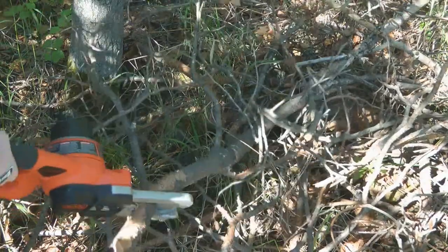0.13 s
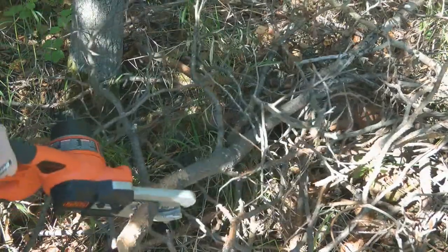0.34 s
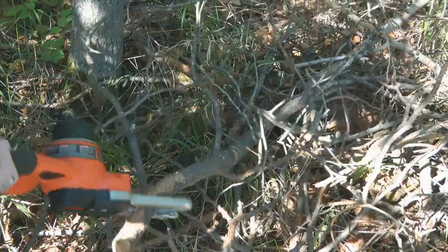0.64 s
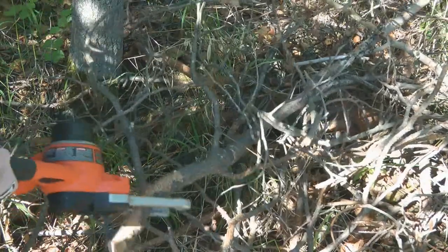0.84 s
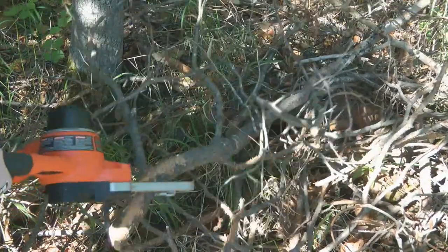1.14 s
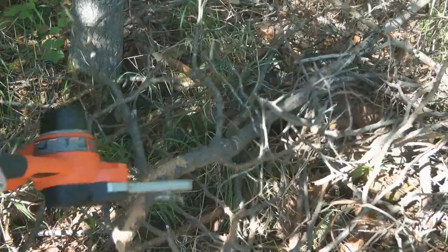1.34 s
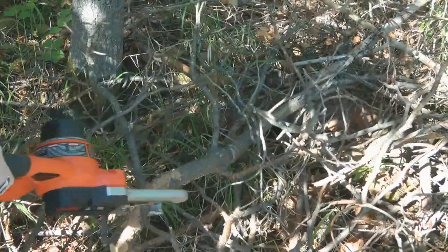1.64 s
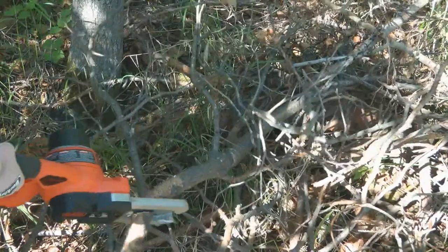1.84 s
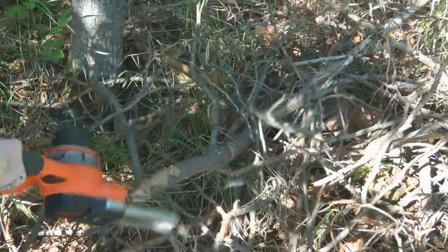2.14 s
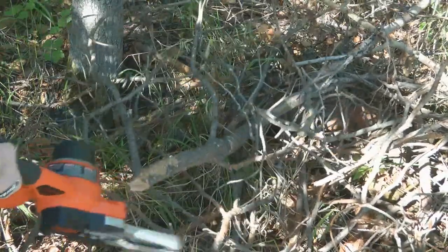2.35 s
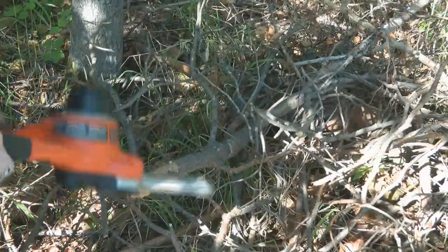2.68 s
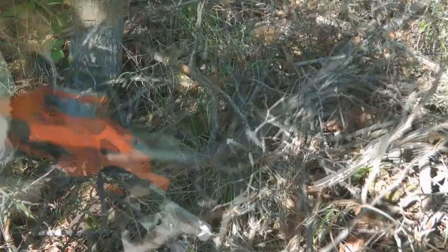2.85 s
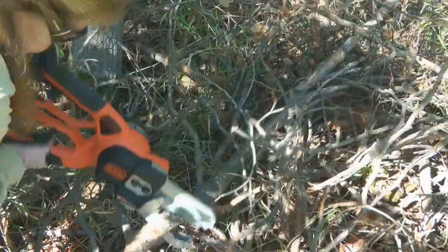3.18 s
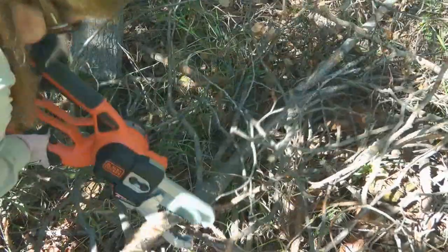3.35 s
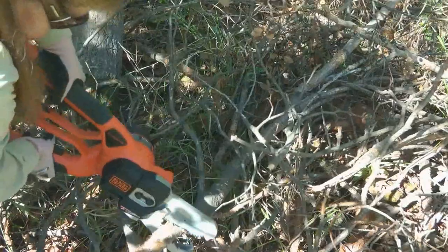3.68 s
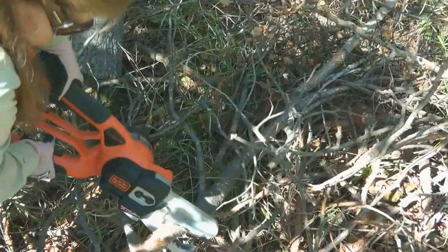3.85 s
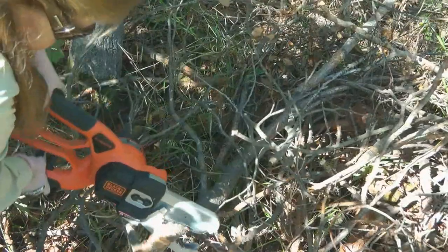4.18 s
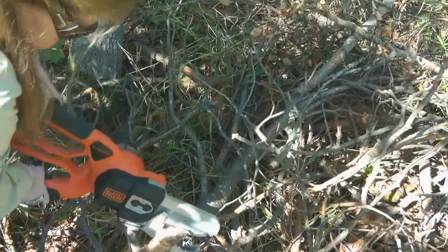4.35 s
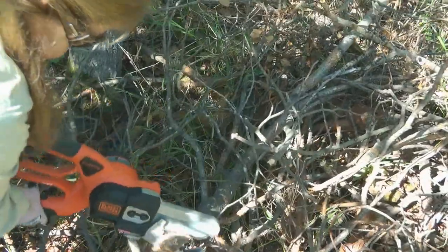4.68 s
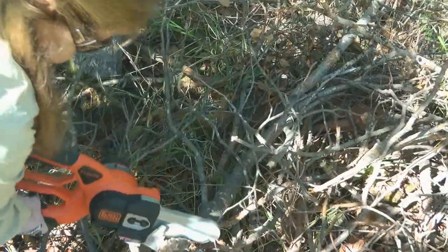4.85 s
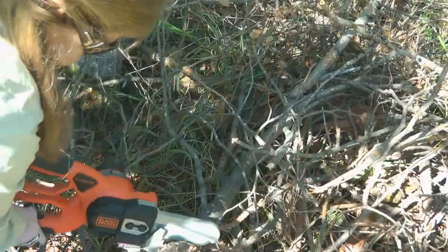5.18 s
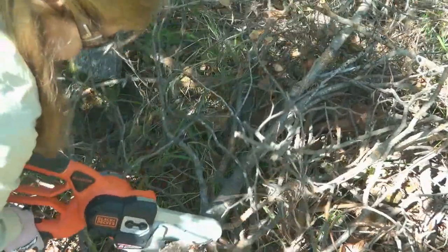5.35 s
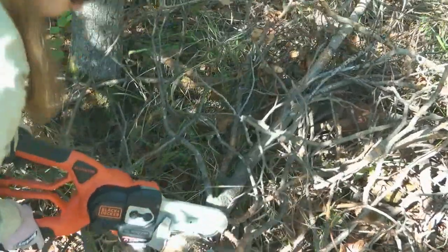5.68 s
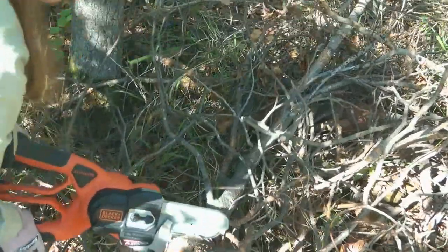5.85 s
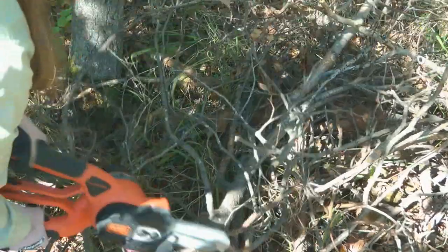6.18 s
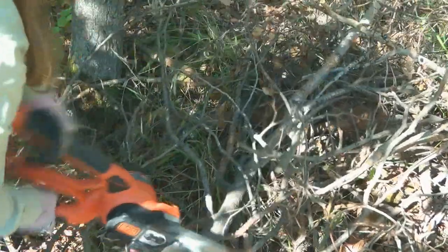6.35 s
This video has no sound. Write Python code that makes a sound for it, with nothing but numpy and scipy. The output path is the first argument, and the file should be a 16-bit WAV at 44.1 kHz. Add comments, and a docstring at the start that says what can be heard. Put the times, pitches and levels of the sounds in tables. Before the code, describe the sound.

In quiet woods, clacking trigger blips and sharp twig cracks lead to a long, rough electric saw cut that drops in pitch under load.

```python
"""Brush rustles under an insect that soon stops, a twig cracks, then a small battery saw is blipped in bursts
and pushed through a dead branch in the woods. Motor: shaft and commutator tones. Chain: dense grains through
the saw's resonances. Cutters: harmonics near the branch resonance. A slack chain squeals, twigs snap and
scrape: shaped noise bursts, thuds, stick-slip. Behind: far traffic and leaves, light air on the microphone."""
import sys
import numpy as np
from scipy import signal
from scipy.fft import rfft, irfft, next_fast_len
from scipy.io import wavfile
from scipy.ndimage import uniform_filter1d, map_coordinates

SR = 44100
rng = np.random.default_rng(int(sys.argv[2]) if len(sys.argv) > 2 else 0)


def generate_wav(signal):
    """Clip the signal to [-1, 1] and save it as 16-bit WAV at the path in sys.argv[1]."""
    frames = np.transpose(np.atleast_2d(signal))
    scaled = np.clip(frames, -1, 1) * 32767
    pcm = np.round(scaled).astype(np.int16)
    wavfile.write(sys.argv[1], SR, pcm)


def nominal_scale(level):
    """Amplitude ratio for a level in decibels (scalar or array-like)."""
    x = np.asarray(level, float) / 20
    return 10 ** x


N = 287532

TOP_TURNS_PER_S = 371   # speed the unloaded motor tends to
TRIGGER_LEAD_S = .016   # switch click and motor start before the chain takes up

# trigger pulls: chain start t/s, let go t/s, switch click level/dB, tearing level (low band)/dB,
# link rattle level (high band)/dB, fading/(dB/s), cutter knock level/dB
PULLS = [(.212, 0.374, -19, -24, -22.5, -7, -45), (0.706, 0.762, -15, -21, -19.5, 39, -43),
         (1.536, 1.799, -14, -24, -23.5, 4, -67), (1.950, 2.447, -20, -28.5, -25.5, -2.5, -50),
         (2.805, 3.068, -10.5, -22.5, -20.5, 47.5, -62), (4.004, 6.598, -10.5, -26, -22, 0.58, -70)]
# long cut loading the motor: t/s, speed/(turns/s), cutter knock level/dB
CUT_LOAD = [(4.001, 191, -50), (4.1, 268, -41), (4.2, 313, -35.5), (4.34, 346, -34.5), (4.55, 330, -36),
            (4.68, 348, -41.5), (4.79, 357, -49.5), (5.29, 344, -37.5), (5.45, 325, -44),
            (5.62, 248, -45.5), (5.88, 234, -42), (6.16, 192, -43), (6.2, 268, -82), (6.281, 340, -43.5),
            (6.399, 363, -50), (6.52, 306, -37.5)]
# twigs loading the motor briefly: t/s, speed/(turns/s), cutter knock level/dB
TWIG_LOAD = [(1.95, 56.5, -56), (2.08, 270, -34), (2.11, 335, -52), (2.2, 335, -52)]
# chain clear of the wood: start t/s, end t/s, drop time/s, drop/dB, regain/(dB/s)
CLEARS = [(2.089, 2.4, 0.016, 5, 32), (6.183, 6.432, 0.1, 11.5, 21.5)]
# branch resonance, nearly steady and narrowing until 5.3 s, then higher and broader: t/s, f/Hz, width/log ratio
BRANCH = [(0, 463, 0.41), (5.3, 465, 0.12), (5.7, 530, 0.33), (6.52, 560, .5)]
# saw colour from the side: f/Hz, level per Hz/dB
SIDE_ON = [(260, -21.5), (450, -1), (794, -9.5), (1120, 1.5), (1980, -3.5), (2660, -4), (6630, -4.5),
           (9070, 1), (16000, -18)]
# saw colour from behind: f/Hz, level per Hz/dB
BEHIND = [(120, -49), (200, -30), (473, -4.5), (763, -6), (1000, 0), (1870, -1.5), (3370, -4), (6640, -9),
          (8120, -2), (16000, -21)]
# ways of holding the saw: start t/s, colour, ringing parts [f/Hz, width/Hz, level above colour/dB]
HOLDS = [ (0, SIDE_ON, [(1010, 270, 2.5), (1360, 93, 1), (2720, 350, 7), (9250, 4900, 1.5)]),
         (3.5, BEHIND, [(985, 100, 5), (3700, 500, -5), (4200, 70, 11), (4620, 60, 11), (7050, 60, 7),
         (14900, 100, 7)]), (5.54, BEHIND, [(1020, 120, 3), (2420, 150, 8.5), (3310, 140, 6), (4610, 60, 4),
         (11200, 400, 5)]), (6.21, BEHIND, [(1289, 1100, -2)])]
# slack chain squealing on the bar: t/s, level/dB
SQUEAL = [(2.88, -52), (2.94, -36), (3.04, -30.5), (3.11, -45)]
# saw position: t/s, left above right/dB
SAW_PAN = [(0, 1.5), (3.5, 1.8), (3.6, 0.6), (6.52, 0.8)]
# twig snaps and tool clacks: t/s, nominal peak level/dB, loudest f/Hz
SNAPS = [(0.131, -21.5, 4700), (0.239, -5, 2640), (0.895, -26.5, 5060), (0.989, -4.5, 4830),
         (1.029, -14, 2150), (1.084, -10.5, 5300), (1.277, -19.5, 3860), (1.352, -5, 3150),
         (1.391, -9, 3100), (1.457, -19.5, 2900), (1.845, -4, 2700), (1.951, -5, 2770), (1.983, -3, 1020),
         (1.995, -5, 1050), (2.053, -5.5, 2820), (2.083, -7, 2800), (2.807, -6.5, 1062),
         (3.373, -11.5, 9030), (3.444, -18, 4970), (3.625, -23, 960), (3.799, -17.5, 3830),
         (3.824, -15, 2040), (3.869, -22, 5920), (4.006, -0.5, 1030), (6.228, -8.5, 8720),
         (6.428, -4, 9300), (6.445, -9, 1190), (6.464, -11, 1180), (6.481, -3.5, 1190)]
# snap colour: f/Hz, level per Hz/dB
SNAP_COLOUR = [(290, -12), (500, -14.5), (1020, 3), (3060, -1.5), (8700, -2.5), (16000, -18)]
# jolts through the handle: t/s, thud level/dB, wood level/dB
JOLTS = [(1.983, -49, -19), (4.005, -30, -19.5), (6.14, -25, -37)]
# branch slipping along the jaw: t/s, length/s, level/dB
CREAKS = [(3.325, 0.117, -35.5), (3.685, 0.049, -42.5)]
# jaw resonances: f/Hz, width of each of two passes/Hz, relative level/dB
JAW = [(1050, 670, -0.5), (1980, 410, 4), (3080, 2800, -4.5)]
# brush dragged about, one curve per drag: t/s, level/dB
RUSTLE = [
    [(0, -44), (.2, -57)],
    [(.98, -48), (1.2, -53), (1.5, -46)],
    [(2.6, -56), (2.79, -58)],
    [(3.15, -60), (3.32, -40), (3.45, -46.5), (3.85, -49.5)],
]
# leaf colour: f/Hz, level per Hz/dB
LEAVES = [(400, 1.5), (1000, -10.5), (8000, -5.5), (16000, -24)]
# echoes off ground and trunks: left lag t/s, right lag t/s, level/dB
ECHOES = [(.0031, 0.0042, -19.5), (.0074, .0063, -17), (.013, 0.014, -13)]
# far traffic and leaves, colour: f/Hz, level per Hz/dB
WOODS_COLOUR = [(88, -23), (150, -12), (361, -12), (398, -11.5), (555, -13), (2870, -23), (16000, -35)]
# air on the microphone ports: t/s, level/dB
AIR = [(0, -59), (2.5, -61), (3.1, -49), (3.6, -57.5), (4.3, -57.5), (6.52, -70)]


def rms_one(x):
    """Scales to rms 1."""
    return x / np.sqrt(np.mean(x ** 2) + 1e-20)


def in_time(curves, silent=-120):
    """Interpolated columns of one or more curves; silent outside them."""
    t = np.arange(N) / SR
    out = np.full((len(curves[0][0]) - 1, N), float(silent))
    for rows in curves:
        s, *columns = np.transpose(rows)
        inside = (t >= s[0]) & (t <= s[-1])
        out[:, inside] = [np.interp(t[inside], s, c) for c in columns]
    return out


def ramp(start_s, end_s, rise_s, fall_s):
    """0, up to 1 from the start on, back to 0 by the end."""
    t = np.arange(N) / SR
    return np.clip(np.minimum((t - start_s) / rise_s, (end_s - t) / fall_s), 0, 1)


def drift(rate_hz):
    """Smooth random wander of about unit spread."""
    steps = int(N / SR * rate_hz) + 3
    return map_coordinates(rng.standard_normal(steps), [np.arange(N) / SR * rate_hz], order=2)


def grains(per_s, spread_db):
    """Random clicks of uneven size; rms 1."""
    sizes = nominal_scale(spread_db * np.minimum(rng.exponential(1, N), 5)) * rng.choice([-1, 1], N)
    return rms_one(sizes * (rng.random(N) < per_s / SR))


def colour(x, spectrum, peaks=()):
    """Minimum-phase filter from a spectrum plus bell resonances; unit power gain on white noise."""
    size = 2 ** 13
    hz = np.maximum(np.arange(size // 2 + 1) * SR / size, 1)
    table_hz, table_db = np.transpose(spectrum)
    db = np.interp(np.log(hz), np.log(table_hz), table_db)
    db = db + sum(top_db / (1 + (2 * (hz - mid_hz) / width_hz) ** 2) for mid_hz, width_hz, top_db in peaks)
    cepstrum = irfft(np.log(nominal_scale(db)))
    cepstrum[1:size // 2] *= 2   # fold to minimum phase
    cepstrum[size // 2 + 1:] = 0
    response = irfft(np.exp(rfft(cepstrum)))
    response = np.atleast_2d(response / np.linalg.norm(response))
    return signal.fftconvolve(x, response, axes=-1)[:, :N]


def resonance(x, hz, width_hz):
    """Two-pole resonator, about unit gain at its peak."""
    r = np.exp(-np.pi * width_hz / SR)
    poles = [1, -2 * r * np.cos(2 * np.pi * hz / SR), r * r]
    return signal.lfilter([(1 - r * r) / 2, 0, (r * r - 1) / 2], poles, x + 1e-18)


def pulls():
    """Motor speed and hum, knock, tearing and rattle levels from trigger pulls and wood load."""
    spin_up_s, brake_turns_per_s2 = .066, 400
    top_hum_db, hum_knee_turns, hum_db_per_load_turn = -37, 46, .21
    hum_fade_share, hum_stop_ratio = .45, 6   # relative to the chain
    hum_db_per_knock_db, quiet_knock_db = .45, -56
    knock_fade_db_per_s = 3
    tear_start_db, rattle_start_db, take_up_s = -6, -25, .013   # shortfall at chain start, time constant
    stop_db_at_stop_s, stop_s, stop_curve = 34.5, .1, 1.36   # after letting go, falls ever faster
    bite_s = .02
    t, out = np.arange(N) / SR, np.full((5, N), -120.)
    cut_turns, cut_db = in_time([TWIG_LOAD, CUT_LOAD], silent=1000)   # 1000: no load
    clear_db = sum(ramp(s, end, drop_s, bite_s) * np.maximum(db - regain * (t - s), 0)
                   for s, end, drop_s, db, regain in CLEARS)
    for on, off, _, tear_db, rattle_db, fade, knock_db in PULLS:
        since, after = t - on, np.maximum(t - off, 0)
        free = TOP_TURNS_PER_S * (1 - np.exp(-np.maximum(since + TRIGGER_LEAD_S, 0) / spin_up_s))
        load = np.maximum(free - cut_turns, 0)
        stop_db = stop_db_at_stop_s * (after / stop_s) ** stop_curve
        slack = np.exp(-np.maximum(since, 0) / take_up_s)
        turns = free - load - brake_turns_per_s2 * after
        hum_db = top_hum_db - ((TOP_TURNS_PER_S - free) / hum_knee_turns) ** 2 - hum_db_per_load_turn * load
        hum_db = hum_db - hum_fade_share * fade * since - hum_stop_ratio * stop_db
        hum_db = hum_db - hum_db_per_knock_db * max(knock_db - quiet_knock_db, 0)
        free_knock_db = knock_db - knock_fade_db_per_s * since - stop_db
        chain_loss_db = fade * since + stop_db + clear_db
        rows = np.array([turns, hum_db, np.where(cut_db < 0, cut_db, free_knock_db),
                         tear_db + tear_start_db * slack - chain_loss_db,
                         rattle_db + rattle_start_db * slack - chain_loss_db])
        inside = (since >= 0) & (after < 1.5 * stop_s)
        out[:, inside] = rows[:, inside]
    return out


def chain(phase, turns, levels_db):
    """Links and cutters strike bar and housing in uneven grains, swelling with left-right cutter pairs."""
    split_hz = 3600   # tearing below, rattle above
    bites_per_s, bite_db, bite_db_per_turn = 300, -14, .045   # lone hard bites, stronger as the chain slows
    beat_db = 1.5 * np.cos(phase) + 1.5 * np.cos(phase / 2 + drift(4)) + 1.3 * np.cos(phase / 4 + drift(3))
    swell = nominal_scale(beat_db + 0.87 * drift(40) + 0.76 * drift(150))
    strikes = swell * (grains(9000, spread_db=-2.0) + 0.6 * rng.standard_normal(N))
    bite_db = bite_db + bite_db_per_turn * (TOP_TURNS_PER_S - np.maximum(turns, 200))
    strikes = strikes + nominal_scale(bite_db) * grains(bites_per_s, spread_db=2.0)
    hold = np.searchsorted([start for start, *_ in HOLDS], np.arange(N) / SR, side="right") - 1
    rung = 0
    for k, (_, spectrum, peaks) in enumerate(HOLDS):
        held = uniform_filter1d(1. * (hold == k), size=3001)   # crossfade
        rung = rung + colour([strikes * held], spectrum, peaks)[0]
    out = 0
    for level_db, kind in zip(levels_db, ("low", "high")):
        part = signal.sosfiltfilt(signal.butter(2, split_hz, kind, fs=SR, output="sos"), rung)
        out = out + nominal_scale(level_db) * part / np.sqrt(uniform_filter1d(part ** 2, size=22001))
    return out


def motor(turns, hum_db):
    """Unbalance hum with its octave; brushes sing on the commutator once the motor runs free."""
    commutator_bars, free_turns_per_s = 12, 367
    phase = 2 * np.pi * np.cumsum(turns) / SR
    whine_db = 2.5 - 1.4 * np.maximum(free_turns_per_s - turns, 0) + drift(20)   # relative to the hum
    tones = np.sin(phase) + nominal_scale(-10.5) * np.sin(2 * phase) + nominal_scale(whine_db) * np.sin(commutator_bars * phase)
    return np.sqrt(2) * nominal_scale(hum_db + 0.37 * drift(25)) * tones


def cutters(phase, rate, knock_db):
    """Cutters knock the branch in step; overtones near its resonance stand out, each wavering."""
    out = 0
    branch_hz, width = in_time([BRANCH])
    for k in range(1, 8):
        off_tune = np.log(k * np.maximum(rate, 1) / branch_hz) / np.maximum(width, .05)
        near_db = -10 * np.log10(1 + off_tune ** 4)
        out = out + nominal_scale(knock_db + near_db + 2.0 * drift(15)) * np.sin(k * phase + 0.66 * drift(25))
    return np.sqrt(2) * out


def squeal(turns):
    """Slack chain on the bar: a rough whistle with its octave, rising with the motor."""
    cycles_per_turn = 16
    phase = 2 * np.pi * cycles_per_turn * np.cumsum(turns) / SR
    tones = drift(600) * np.sin(phase) + 0.35 * drift(900) * np.sin(2 * phase)
    return nominal_scale(in_time([SQUEAL])[0]) * tones


def snaps():
    """Each snap or trigger click is a dying crackle, part broad, part ringing at its own pitch."""
    trigger_hz, crest_db = 2650, 14   # crest: nominal peak above mean
    out, t = np.zeros(N + SR), np.arange(SR // 5) / SR
    rows = [(on - TRIGGER_LEAD_S, db, trigger_hz) for on, _, db, *_ in PULLS] + SNAPS
    crackle = colour(rng.standard_normal((len(rows), len(t))), SNAP_COLOUR)[:, :len(t)]
    fall = nominal_scale(-60 * t / 0.036) + nominal_scale(-25.5 - 60 * t / 0.43)   # crack, then twigs settling
    attack = np.minimum(t / 0.0002, 1)
    for noise, (s, peak_db, hz) in zip(crackle, rows):
        sound = noise + 0.57 * rms_one(resonance(noise, hz, 0.14 * hz))
        out[round(s * SR):][:len(t)] += nominal_scale(peak_db - crest_db) * sound * fall * attack
    return out[:N]


def jolts():
    """A low, heavily damped thud with a short ring of the branch."""
    s, thud_db, wood_db = np.transpose(JOLTS)
    t = np.maximum(np.arange(N) / SR - s[:, None], 0)
    thud = np.exp(-t / 0.0032) * np.sin(2 * np.pi * 110 * t)
    wood = np.exp(-t / 0.0059) * (np.sin(2 * np.pi * 460 * t) + np.sin(2 * np.pi * 720 * t))
    return nominal_scale(thud_db) @ thud + nominal_scale(wood_db) @ wood


def creak():
    """Uneven stick-slip puffs of scraping ring the jaw."""
    edge_s = .006
    slips = (np.cumsum(100 * (1 + 0.4 * drift(80))) / SR) % 1   # about 100 per s
    scrape = rng.standard_normal(N) * (.6 + np.exp(-slips / .2)) * nominal_scale(2.0 * drift(90))
    level = sum(nominal_scale(db) * ramp(s, s + length, edge_s, edge_s) for s, length, db in CREAKS)
    rung = sum(nominal_scale(db) * resonance(resonance(scrape, hz, width), hz, width) for hz, width, db in JAW)
    return level * rms_one(rung)


def rustle():
    """Dragged brush: leaf clicks at a wandering density."""
    clicks = grains(2500 * nominal_scale(4.4 * drift(12)), spread_db=2.5)
    return nominal_scale(in_time(RUSTLE)[0]) * colour([clicks], LEAVES)[0]


def echoes(near):
    """Adds dulled delayed copies off ground and trunks."""
    dull = signal.lfilter(*signal.butter(1, 12000, fs=SR), near)
    for *lags_s, db in ECHOES:
        for ch, lag_s in enumerate(lags_s):
            lag = round(lag_s * SR)
            near[ch, lag:] += nominal_scale(db) * dull[ch, :N - lag]
    return near


def insect():
    """Noise twice through one narrow resonance, soon stopping."""
    hz, pass_width_hz, level_db, stop_s = 5020, 140, -54, .25
    noise = rng.standard_normal(N)
    whistle = rms_one(resonance(resonance(noise, hz, pass_width_hz), hz, pass_width_hz))
    return nominal_scale(level_db) * ramp(-1, stop_s, 1, .05) * whistle


def far_woods():
    """Far traffic and leaves: coloured noise, mostly alike on both sides."""
    mid, side = colour(rng.standard_normal((2, N)), WOODS_COLOUR)
    return nominal_scale(-50 + 1.0 * drift(2.57)) * (mid + 0.36 * side * [[1], [-1]])


def air():
    """Lumpy low noise reaching the two microphone ports out of phase."""
    skew_share = 1.2
    band = signal.butter(2, [30, 130], "band", fs=SR, output="sos")
    gust, own = signal.sosfilt(band, rng.standard_normal((2, N)))
    skew = np.imag(signal.hilbert(gust, next_fast_len(N)))[:N] + 0.1 * own   # quarter-cycle shift
    level = nominal_scale(in_time([AIR])[0] + 1.26 * drift(5.6))
    return level * rms_one(gust + skew_share * skew * [[1], [-1]])


def scene():
    """Saw and twigs with echoes, over the woods; stereo."""
    cutters_per_turn = .695   # reduction gear times cutters per sprocket turn
    turns, hum_db, knock_db, *chain_db = pulls()
    rate = cutters_per_turn * np.maximum(turns, 0)
    phase = 2 * np.pi * np.cumsum(rate) / SR
    saw = chain(phase, turns, chain_db) + motor(turns, hum_db) + cutters(phase, rate, knock_db)
    saw = saw + squeal(np.maximum(turns, 0))
    panned = saw * nominal_scale(in_time([SAW_PAN]) * [[.5], [-.5]])
    near = echoes(panned + snaps() + jolts() + creak() + rustle())
    near_db = -1.5   # common level of saw, snaps, jolts, creaks and rustle
    return nominal_scale(near_db) * near + insect() + far_woods() + air()


def top_cut(x):
    """Nothing passes above the cut-off."""
    return signal.sosfilt(signal.butter(12, 17080, fs=SR, output="sos"), x)


def record(dry):
    """Rounds the peaks by soft saturation."""
    mix = 0.71 * np.tanh(dry / 0.65)
    return top_cut(mix)


dry = scene()
out = record(dry)
generate_wav(out)
```